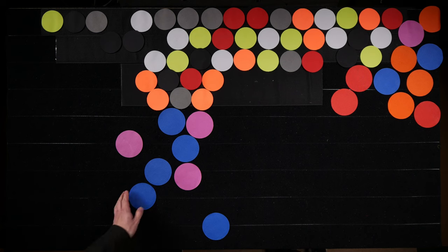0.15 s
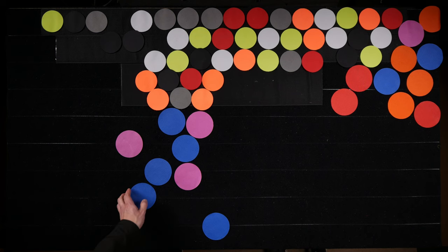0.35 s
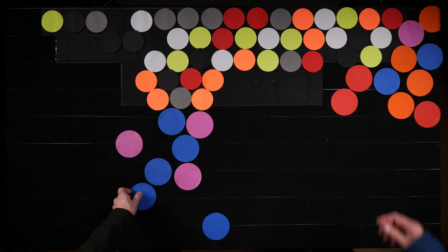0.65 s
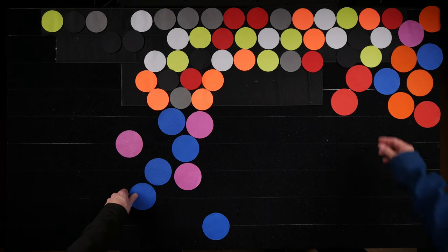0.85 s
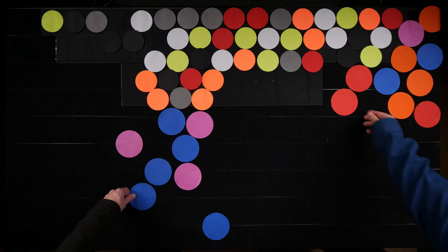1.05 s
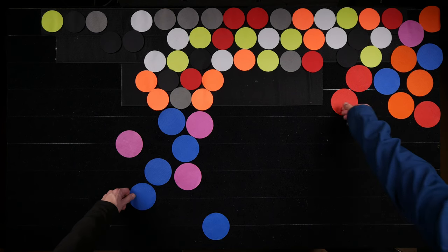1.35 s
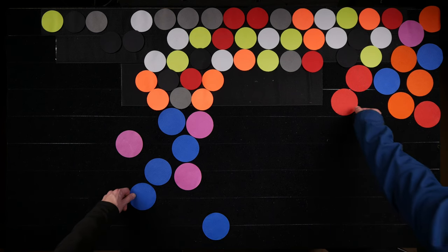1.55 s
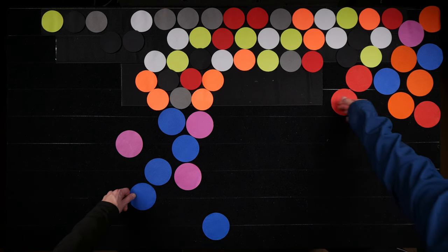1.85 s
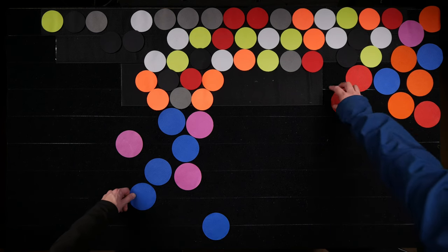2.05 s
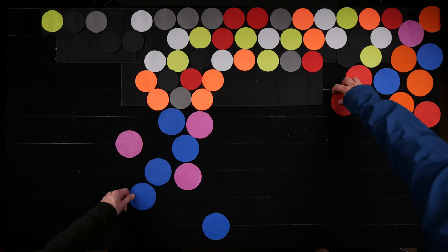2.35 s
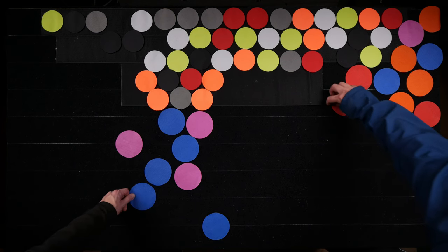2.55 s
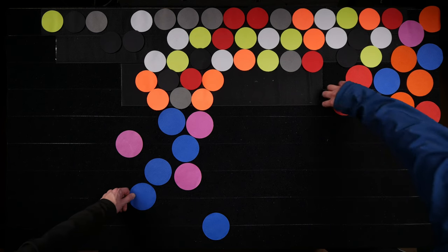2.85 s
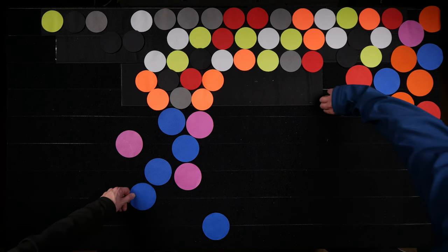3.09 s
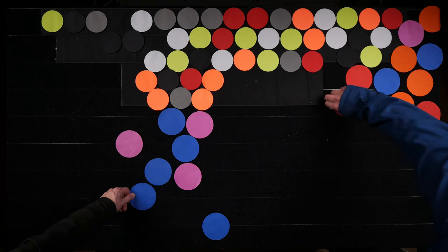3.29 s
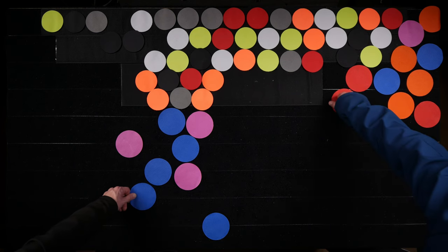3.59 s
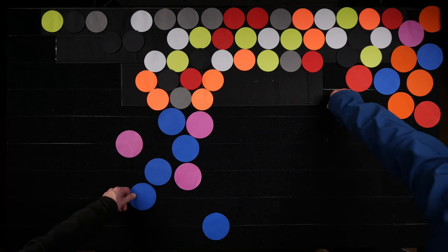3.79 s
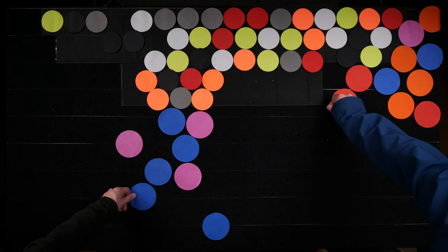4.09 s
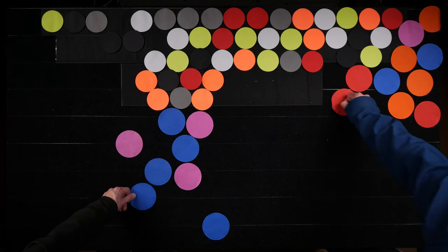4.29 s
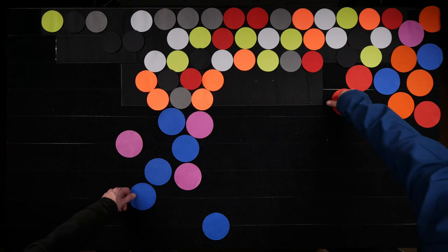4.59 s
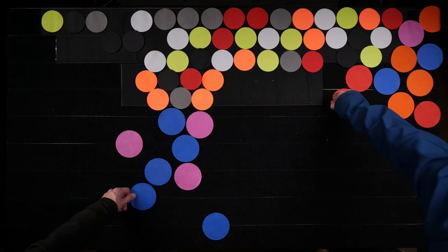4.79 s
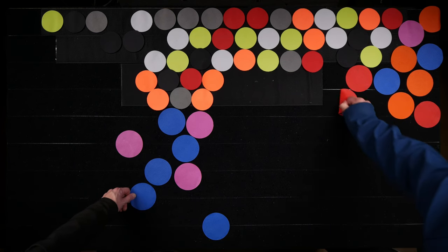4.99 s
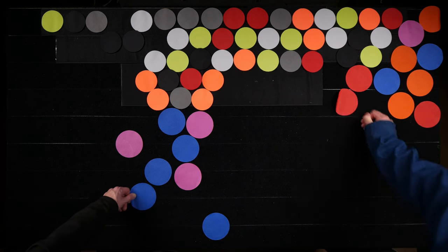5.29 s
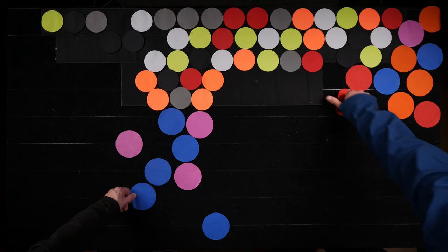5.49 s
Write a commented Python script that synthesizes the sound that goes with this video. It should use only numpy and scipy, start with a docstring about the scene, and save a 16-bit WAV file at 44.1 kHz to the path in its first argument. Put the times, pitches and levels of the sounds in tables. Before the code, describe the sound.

A quiet, close, dry stereo scene of fingers on felt hook-and-loop patches fixed to a large board, with soft steady hiss beneath. From 0 to 0.35 s a light cloth rub brushes past, with a small snap at 0.3. A brief crackly cluster of hook clicks and finger taps comes at 0.55-0.72, then faint rubs and ticks until 1.4. A short soft pull falls near 1.9. From 2 to 4 s it is mostly hush: lone tiny snaps, hollow fingertip scuffs, and a small click cluster around 3.4. At 4.2-4.28 a sharper bright crackle comes with a low knock. Little clicks thicken from 4.7, then the loudest event: a dense, crisp rip from 4.88 to about 5.17, strongest around 5.03, ending in a sharp snap and deep board thump at 5.15. Its low sway dies away under light clicks at 5.34-5.47 and a faint last tick at 5.62.

```python
"""Felt patches on a board

Felt patches with hook-and-loop backs are touched, peeled and pressed on a large board under two spaced microphones.
Hooks let go in dense clicks while a patch peels and in lone snaps: short noise bursts sent through resonances.
Sleeves and fingertips rustle as finer grains of noise, and dragging finger pads add hollow tones.
The board sways as a slow sine and knocks at its next few modes; a small damped room adds a short tail, over soft hiss."""
import sys
import numpy as np
from scipy import signal
from scipy.io import wavfile
from scipy.ndimage import uniform_filter1d, map_coordinates

SR = 44100
rng = np.random.default_rng(int(sys.argv[2]) if len(sys.argv) > 2 else 0)


def dump(signal):
    """Clip the signal to [-1, 1] and save it as 16-bit WAV at the path in sys.argv[1]."""
    limited = np.clip(np.atleast_2d(signal).T, -1, 1)
    pcm = np.round(limited * 32767).astype(np.int16)
    wavfile.write(sys.argv[1], SR, pcm)


N = 248724  # length of the scene in samples


def peel():
    """Rows of hooks tear loose while a patch is pulled: a dense tear with single hooks on top."""
    tear = crackle(rate=6900.0, spread_db=3.0, bunch_db=0.66, bunch_rate=300.0, burst_s=0.00016)
    lone_hooks = crackle(rate=260.0, spread_db=9.0, bunch_db=2.2, bunch_rate=160.0, burst_s=0.00021)
    tear_gains, lone_gains = pulls()
    return tear_gains * tear + lone_gains * lone_hooks


# Short pulls on a patch: (start [s], length [s], first level [dB], last level [dB],
# thud [dB re level], sizzle [dB re level], lone hooks [dB re the tear])
PEELS = [(0.65, 0.056, -51.5, -48.5, -3, 2, -7.5), (1.885, 0.08, -47, -52.5, -10, -5, -17),
         (3.395, 0.04, -56.5, -64, -7.5, -3, -15), (4.19, 0.074, -51, -41.5, -9, 2.5, -3),
         (4.375, 0.0069, -55.5, -49.5, -4, 2, -12), (5.44, 0.022, -49.5, -59, -1, 0, -7)]
PEEL_RISE_DB_S, PEEL_FALL_DB_S = 1500.0, 914
# The long tear: (time [s], level [dB], thud [dB re level], sizzle [dB re level])
TEAR = [(4.878, -52, 0, -5), (4.887, -46, -4, 4), (4.904, -40, -2.5, 2.5), (4.939, -30.5, -8.5, 3.5),
        (5.002, -29, -10.5, -7), (5.03, -24, -15, -12.5), (5.09, -29, -4.5, -4), (5.138, -31, -6.5, -6),
        (5.16, -39.5, -9, -12), (5.184, -54, -12, -18)]
TEAR_LONE_DB = -15  # lone hooks, relative to the long tear


def pulls():
    """Gains of the tear and of its lone hooks in the three ranges: short pulls plus the long tear."""
    level_db, thud_db, sizzle_db = curve(TEAR, outside=-120.0)
    long_tear = undb(level_db + np.array([thud_db, 0 * level_db, sizzle_db]))
    short_pulls = strokes(PEELS, PEEL_RISE_DB_S, PEEL_FALL_DB_S)
    return short_pulls + np.array([long_tear, long_tear * undb(TEAR_LONE_DB)])


# Lone hooks letting go: (time [s], level over the first 3 ms [dB], sizzle [dB re level])
SNAPS = [(0.3015, -46, 5), (0.485, -69, 10), (0.494, -69, 12), (0.509, -58, -10), (0.524, -52.5, -3),
         (0.5575, -51.5, 11.5), (0.643, -45.5, 9.5), (0.648, -56, 13), (0.6502, -40, 4), (0.6558, -47, 2),
         (0.67, -44, 1), (0.691, -39, 1), (0.7163, -43, -1), (0.834, -61, -9), (0.9232, -72, 19),
         (0.935, -67.5, 15), (1.0048, -66, 13), (1.032, -67, 12), (1.1083, -48.5, -17), (1.1329, -47.5, -2),
         (1.3305, -50, -4), (1.357, -47.5, 0), (1.3604, -51.5, 0.5), (1.824, -42, -3), (1.855, -53, -3),
         (1.867, -55, 1), (1.889, -55, -20), (2.2414, -54, -27), (2.3569, -58, 2), (2.369, -57, -9),
         (2.4164, -58.5, -12), (2.434, -51.5, -11), (2.693, -82.5, 18.5), (2.7412, -83.5, 18.5),
         (2.8759, -54.5, -3), (2.888, -50, -23), (2.9988, -48.5, 1.5), (3.0412, -59, -7), (3.3408, -66, 20),
         (3.3522, -55.5, 15), (3.39, -64.5, 15.5), (3.3988, -43.5, -7), (3.42, -42.5, -5.5),
         (3.4317, -49, -6), (3.5209, -65.5, 8), (3.55, -61, -20), (3.6469, -48, 6), (3.8097, -47.5, -12),
         (3.9285, -76, 21), (3.964, -56.5, -8), (4.0647, -54.5, -10), (4.115, -50, -2),
         (4.1183, -48.5, 5.5), (4.143, -62.5, 12.5), (4.164, -54, -4), (4.179, -55, -2), (4.1918, -47, 9),
         (4.206, -49, 5), (4.219, -48, 17.5), (4.224, -44, 18), (4.2309, -46, 16), (4.2345, -36.5, 11),
         (4.2361, -34, 4), (4.2517, -56, 4), (4.2632, -46, -4), (4.2706, -42, 4.5), (4.3673, -59, 7),
         (4.379, -46.5, 10), (4.3865, -60, 17), (4.5055, -57, 4.5), (4.5496, -59.5, 10.5), (4.6963, -57, 7),
         (4.7097, -49, 8), (4.7595, -47, 13.5), (4.7849, -47.5, 2), (4.8166, -37, -2), (4.849, -58, 11),
         (4.8625, -53, 5), (4.8838, -48.5, 15), (4.893, -39.5, 2.5), (4.9131, -34, 7), (4.921, -34, 0),
         (4.9345, -36, 7), (4.9418, -30, 5), (5.144, -37, -5), (5.1552, -38, 16), (5.159, -25.5, -28),
         (5.1727, -52, 10), (5.3104, -73, 20.5), (5.3415, -46, 7.5), (5.3478, -48.5, 8), (5.39, -54, -9),
         (5.3978, -41.5, 6.5), (5.442, -41, -2), (5.4493, -48, 4), (5.4653, -51, 14), (5.4679, -39, 3.5),
         (5.6212, -51.5, -23)]
SNAP_THUD_DB = -23  # relative to the level of each snap
# Fingertips tapping the felt: (time [s], level over the first 3 ms [dB])
TAPS = [(0.5561, -53), (0.6509, -44), (0.69, -46), (0.849, -58), (0.873, -57), (0.902, -56), (0.925, -58),
        (0.96, -61.5), (1.1179, -66.5), (1.357, -60), (1.8895, -43), (2.703, -61.5), (2.9977, -49),
        (3.3996, -52.5), (3.6485, -53), (4.115, -54), (4.166, -56), (4.1915, -55), (4.2388, -41.5),
        (4.2706, -34.5), (4.3763, -45), (4.7095, -58), (4.784, -48), (4.8152, -47), (4.8846, -54),
        (4.9041, -35), (5.1547, -28), (5.342, -47), (5.3483, -45.5), (5.3953, -47.5), (5.4494, -44),
        (5.469, -38.5)]
CRACK_T60_S = 0.0013  # time for the crack to fall by 60 dB
FIZZ_DB, FIZZ_T60_S = -13, 0.013  # fizz of a hook, relative to its crack
TAP_FIZZ_DB, TAP_T60_S = -11, 0.02  # the same for a fingertip


def snaps():
    """Each snap or tap is a sharp crack with a dying fizz; hooks are bright, fingertips dull."""
    t = np.arange(4096) / SR
    out = np.zeros((3, N + len(t)))
    hits = []
    for s, db, sizzle_db in SNAPS:
        gains = undb(db + np.array([SNAP_THUD_DB, 0, sizzle_db]))
        hits.append((s, gains, FIZZ_DB, FIZZ_T60_S))
    for s, db in TAPS:
        thud_only = undb(db) * np.array([1, 0, 0])
        hits.append((s, thud_only, TAP_FIZZ_DB, TAP_T60_S))
    crack = np.exp(-np.log(1000) * t / CRACK_T60_S)
    for s, gains, fizz_db, t60 in hits:
        grain = rng.standard_normal(len(t))
        fizz = undb(fizz_db) * np.exp(-np.log(1000) * t / t60)
        burst = np.sign(grain) * crack + grain * fizz
        burst = burst / np.sqrt(np.mean(burst[t < 0.003] ** 2))
        start = int(s * SR)
        out[:, start:start + len(t)] += np.outer(gains, burst)
    return out[:, :N]


# Strokes of cloth and fingertips: (start [s], length [s], first level [dB], last level [dB],
# thud [dB re level], sizzle [dB re level])
RUBS = [(0.0, 0.093, -54, -56, -7, -3), (0.12, 0.21, -56.5, -58, -33, 1),
        (0.31, 0.081, -65, -60, -2.5, -4.5), (0.5, 0.075, -82, -71.5, -3, 7),
        (0.73, 0.046, -58, -72, -8.5, -0.5), (0.83, 0.11, -62.5, -65, -2.5, -0.5),
        (1.0, 0.12, -74.5, -57, -12.5, -2.5), (1.31, 0.0067, -74.5, -69, -8, -3),
        (1.4, 0.073, -66.5, -62.5, -5, -2), (1.5, 0.1, -67.5, -59, -2.5, -1),
        (1.74, 0.18, -78, -59.5, 5, -11.5), (2.08, 0.071, -82, -75, -7.5, 2.5),
        (2.28, 0.051, -76, -72.5, -4, -7.5), (2.5, 0.031, -77, -76.5, -7, 0),
        (2.6, 0.037, -87.5, -74, -8.5, -26), (2.96, 0.049, -77.5, -64.5, -4, 1.5),
        (3.05, 0.24, -82.5, -93, -7, 9.5), (3.34, 0.023, -82, -80, 4, 8), (3.5, 0.075, -79, -81, -20, 4),
        (3.645, 0.042, -74, -74, -9, 3.5), (3.75, 0.063, -78, -66.5, -13, 5.5),
        (3.83, 0.057, -80, -73.5, -28, 1.5), (4.112, 0.056, -77, -63, -22, -2.5),
        (4.29, 0.03, -63, -58.5, -5, -3), (4.4, 0.054, -74, -76, -7, 3),
        (4.55, 0.067, -68.5, -77.5, -2, 3.5), (4.68, 0.06, -71, -62.5, -7, 5.5),
        (4.79, 0.084, -72.5, -53, -0.5, 0), (5.19, 0.076, -61, -65, -7.5, -6.5),
        (5.343, 0.025, -58.5, -73, -7, -33), (5.395, 0.033, -64, -65, -23, -25),
        (5.48, 0.12, -68, -67, -7, -3)]
RUB_RISE_DB_S, RUB_FALL_DB_S = 542, 432


def rub_gains():
    """Gains of the rubbing strokes in the three ranges."""
    return strokes(RUBS, RUB_RISE_DB_S, RUB_FALL_DB_S)[0]


# Faint rustle between the strokes: (time [s], level [dB])
RUSTLE = [(0, -66.5), (1.15, -70.5), (1.28, -77), (1.68, -73), (2.0, -75), (2.62, -77.5), (2.68, -109),
          (2.82, -76), (2.9, -72), (3.45, -72), (3.62, -80), (4.0, -75.5), (4.1, -87), (4.45, -86),
          (4.52, -97), (4.65, -83), (5.33, -97), (5.64, -75)]
RUSTLE_THUD_DB, RUSTLE_SIZZLE_DB = -15.5, -11  # relative to the rustle level
RUB_LONE_DB = -7  # catching fibres, mostly sizzle with a little body, relative to the grain


def rub():
    """Cloth slides on cloth: a dense fine grain, now and then a fibre that catches."""
    rustle = undb(curve(RUSTLE) + np.array([[RUSTLE_THUD_DB], [0], [RUSTLE_SIZZLE_DB]]))
    grain = crackle(rate=12000.0, spread_db=1.5, bunch_db=3.02, bunch_rate=200.0, burst_s=0.00016)
    catches = crackle(rate=90.0, spread_db=3.0, bunch_db=2.2, bunch_rate=6.7, burst_s=0.0003)
    catches = catches * np.array([[0], [0.3], [1]])  # thud, body, sizzle
    return (rub_gains() + rustle) * (grain + undb(RUB_LONE_DB) * catches)


# Finger pads dragging over the felt: (start [s], length [s], level [dB], tone [Hz])
SCUFFS = [(0.29, 0.07, -74.5, 330), (0.46, 0.033, -63.5, 950), (0.839, 0.084, -67, 760),
          (0.956, 0.09, -65.5, 900), (1.07, 0.047, -74, 332), (1.41, 0.043, -64.5, 506),
          (1.508, 0.093, -66.5, 586), (1.734, 0.07, -66, 563), (1.878, 0.019, -54, 450),
          (2.03, 0.039, -78, 700), (2.297, 0.022, -70, 597), (2.617, 0.038, -77.5, 530),
          (2.905, 0.04, -79, 680), (3.154, 0.033, -72, 1090), (3.55, 0.015, -70, 1350),
          (3.785, 0.041, -78, 514), (4.218, 0.042, -54, 430)]
SCUFF_Q = 3  # sharpness of each of the two resonances


def scuff():
    """A dragging pad sticks and slips; the hollow under it rings."""
    grain = crackle(rate=900.0, spread_db=1.8, bunch_db=2.2, bunch_rate=66.0, burst_s=0.002)
    out = np.zeros(N)
    for s, length, db, hz in SCUFFS:
        gain = strokes([(s, length, db, db, 0, 0)], RUB_RISE_DB_S, RUB_FALL_DB_S)[0, 1]
        near = slice(int((s - 0.1) * SR), int((s + length + 0.25) * SR))
        width = hz / SCUFF_Q
        tone = band(band((gain * grain)[near], hz, width), hz, width)
        # make up for what the narrow resonances take away
        out[near] += tone * np.sqrt(SR * SCUFF_Q / (hz * np.pi / 2))
    return out


# A hand pushes or steadies the board and leaves it swaying at a new size: (time [s], level [dB])
SWAYS = [(0, -54.5), (0.25, -60.5), (0.5, -61.5), (0.7, -50.5), (1.21, -47.5), (1.33, -48.5), (1.62, -56),
         (1.98, -63), (2.165, -47.5), (2.58, -59.5), (2.66, -73.5), (3.0, -58), (3.3, -56), (3.45, -80),
         (3.511, -51.5), (3.828, -52.5), (4.04, -68), (4.16, -55.5), (4.26, -43.5), (4.5, -51.5),
         (4.79, -58), (4.86, -48), (5.05, -49), (5.17, -34.5)]
SWAY_HZ = 29.5  # centre of a slightly wandering pitch
SWAY_T60_S, SWAY_SETTLE_S = 2.02, 0.026


def sway():
    """The panel swings at its lowest mode and dies away slowly after each change of size."""
    t = np.arange(N) / SR
    since, size_db = np.transpose(SWAYS)
    last = np.maximum(np.searchsorted(since, t, side="right") - 1, 0)
    size = undb(size_db[last] - 60 * (t - since[last]) / SWAY_T60_S)
    size = uniform_filter1d(size, int(SWAY_SETTLE_S * SR))
    turn = 2 * np.pi * np.cumsum(SWAY_HZ * (1 + 0.0359 * walk(4.1))) / SR
    # the two microphones hang over different parts of the panel
    swing = np.sqrt(2) * np.sin(turn + 0.18 * np.array([[1], [-1]]))
    return size * undb(1.0 * walk(12.0)) * swing


# Fingers landing on the board; both levels drive the filters below:
# (time [s], peak of the push [dB], rumble that follows [dB])
THUMPS = [(0.343, -45, -83), (0.644, -51, -65), (1.3, -53.5, -79), (1.345, -46, -68), (1.419, -52, -61),
          (1.791, -54, -58.5), (1.868, -66, -75), (2.16, -74, -70), (2.302, -48, -70), (2.701, -62, -75),
          (2.997, -51, -72), (3.355, -51.5, -62), (3.41, -76, -64), (3.515, -68, -65),
          (4.231, -30.5, -44.5), (4.262, -32.5, -44), (4.549, -66, -72), (4.702, -59.5, -57),
          (4.89, -40, -49.5), (4.918, -33, -54), (5.153, -17.5, -35.5), (5.163, -33, -41),
          (5.456, -58, -76)]
PUSH_S = 0.0045  # length of one push
# The board's next few modes: (frequency [Hz], width [Hz], relative gain [dB])
KNOCK_MODES = [(44, 17.4, 4), (75.4, 5.8, 0.5), (93, 5.7, -5.5), (145.5, 15.2, -2), (209, 80, -16)]
# steady shake, then shake relative to the tear and to the rubbing
KNOCK_FLOOR_DB, KNOCK_TEAR_DB, KNOCK_RUB_DB = -82, -9.5, -27
KNOCK_T60_S = 0.17  # time for a rumble to fall by 60 dB


def knocks():
    """Tearing, rubbing and landing fingers shake the board's next few modes; each push also thumps."""
    s, peak_db, rumble_db = np.transpose(THUMPS)
    pushes, rumbles = np.zeros((2, N))
    pushes[(s * SR).astype(int)] = undb(peak_db)
    rumbles[(s * SR).astype(int)] = undb(rumble_db)
    pushes = signal.fftconvolve(pushes, np.hanning(int(PUSH_S * SR)))[:N]
    shake = undb(KNOCK_FLOOR_DB) + undb(KNOCK_TEAR_DB) * pulls()[0, 0]
    shake = shake + undb(KNOCK_RUB_DB) * rub_gains()[1]
    shake = shake + signal.lfilter([1], [1, -1000 ** (-1 / (KNOCK_T60_S * SR))], rumbles)
    mid = shake * rng.standard_normal(N)
    side = shake * rng.standard_normal(N)
    opposite = np.array([[1], [-1]])  # left and right move against each other
    drive = mid + undb(-13.0) * side * opposite + undb(-25.5) * pushes
    knock = ring(drive, KNOCK_MODES, patchy_db=-1.0)
    knock = knock + undb(-6.0) * ring(side, KNOCK_MODES[1:2], patchy_db=-0.5) * opposite
    return knock + undb(-18.5) * band(pushes, 110, 370)


# Who sounds from when, sleeve in the middle and a patch on each side:
# (time [s], left lags right [ms], left minus right [dB])
PLACES = [(0, .18, -.5), (.47, -.25, 0), (.87, .16, -.5), (1.19, .45, -3), (4.08, .41, -2),
          (4.33, -.23, -1), (4.42, .43, -1), (5.27, -.23, 0), (5.52, .43, 0)]
# the sounding spot jumps about the patch, further over a sleeve
HOOK_SPREAD_MS, CLOTH_SPREAD_MS, JUMPS_PER_S = 0.019, 0.072, 500


def place(x, spread_ms):
    """A source off to one side reaches the two microphones at different times, often at different levels."""
    s, lag_ms, pan_db = np.transpose(PLACES)
    n = np.arange(N)
    now = np.searchsorted(s * SR, n, side="right") - 1
    late = n - (lag_ms[now] + spread_ms * walk(JUMPS_PER_S)) * SR / 1000
    left = map_coordinates(x, [late], order=3, mode="nearest")
    return np.array([left * undb(pan_db[now] / 2), x * undb(-pan_db[now] / 2)])


# Resonances that hooks, taps and rubbed cloth all sound through, by range:
# (frequency [Hz], width [Hz], relative gain [dB])
THUD = [(336, 89, -10), (493, 99, 3.5), (744, 820, 1), (1211, 306, 3.5)]
BODY = [(1310, 1480, 1), (2525, 424, 7), (3034, 368, 0.5), (3593, 280, 7.5), (5180, 6100, -2),
        (6440, 700, -0.5)]
SIZZLE = [(7800, 9300, -62), (7960, 13500, 75), (11000, 7300, -3), (16600, 2900, 21)]
# Edges of the thud, body and sizzle ranges: (low [Hz], high [Hz])
EDGES_HZ = [(260, 1300), (1300, 6800), (5600, 18000)]


def colour(drive, patchy_db):
    """The three ranges, each through its resonances and kept to its edges."""
    out = np.zeros(N)
    for x, modes, edges in zip(drive, (THUD, BODY, SIZZLE), EDGES_HZ):
        edge_filter = signal.butter(2, edges, "band", fs=SR, output="sos")
        out += signal.sosfilt(edge_filter, ring(x, modes, patchy_db))
    return out


ROOM_T60_S, ROOM_DB, ROOM_HZ = 0.06, -12.5, 9100  # decay time, tail level, treble cut


def room(x):
    """A short diffuse tail, duller than the direct sound and different at each microphone."""
    t = np.arange(SR // 3) / SR
    decay = np.exp(-np.log(1000) * t / ROOM_T60_S)
    tail = rng.standard_normal((2, len(t))) * decay * np.minimum(t / 0.008, 1)
    tail = signal.lfilter(*signal.butter(1, ROOM_HZ, fs=SR), tail)
    tail = tail * undb(ROOM_DB) / np.sqrt(np.sum(tail ** 2) / 2)
    return signal.fftconvolve(x[None], tail, axes=1)[:, :N]


def hiss():
    """Soft steady noise, separate at each microphone, strongest around 4300 Hz."""
    return undb(-75.5) * band(rng.standard_normal((2, N)), 4300, 7160)


def strokes(rows, rise_db_s, fall_db_s):
    """Gains in three ranges: strokes rise, slide from first to last level, fall; a last column scales a second set."""
    t, out = np.arange(N) / SR, np.zeros((2, 3, N))
    for s, length, first_db, last_db, thud_db, sizzle_db, *extra_db in rows:
        near = slice(max(int((s - 0.1) * SR), 0), int((s + length + 0.2) * SR))
        u = t[near] - s
        db = np.interp(u, [0, length], [first_db, last_db])
        db = db + rise_db_s * np.minimum(u, 0) - fall_db_s * np.maximum(u - length, 0)
        gains = undb(db + np.array([[thud_db], [0], [sizzle_db]]))
        out[0, :, near] += gains
        out[1, :, near] += gains * undb(sum(extra_db))
    return out


def crackle(rate, spread_db, bunch_db, bunch_rate, burst_s):
    """Random releases, a few much larger than most, coming in bunches; each is a short burst."""
    hits = (rng.random(N) < rate / SR) * undb(2 * spread_db * rng.exponential(size=N))
    power = signal.lfilter([1], [1, -np.exp(-1 / (burst_s * SR))], hits)
    return unit(np.sqrt(power) * rng.standard_normal(N) * undb(bunch_db * walk(bunch_rate)))


def ring(drive, modes, patchy_db):
    """Resonances side by side, each flickering in level; scaled to roughly keep the level of white noise."""
    impulse = (np.arange(16384) == 0) * 1.0
    response, out = 0, 0
    for k, (hz, width, db) in enumerate(modes):
        sign = (-1) ** k  # neighbours swing in opposite sense, so the gaps between them fill
        response = response + sign * undb(db) * band(impulse, hz, width)
        out = out + sign * undb(db + patchy_db * walk(200)) * band(drive, hz, width)
    return out / np.sqrt(np.sum(response ** 2))


def band(x, hz, width):
    """One resonance, gain 1 at the centre."""
    return signal.lfilter(*signal.iirpeak(hz, hz / width, fs=SR), x)


def walk(rate):
    """Random levels held 1 / rate s and slewed; spread near 1."""
    k = int(SR / rate)
    steps = np.repeat(rng.standard_normal(N // k + 1), k)
    return 1.066 * uniform_filter1d(steps, k)[:N]


def curve(rows, outside=None):
    """Columns of (time, value, ..) rows at every sample, joined by straight lines."""
    s, *columns = np.transpose(rows)
    return np.array([np.interp(np.arange(N) / SR, s, c, outside, outside) for c in columns])


def undb(db):
    """Decibels to a plain gain."""
    return 10 ** (np.asarray(db) / 20)


def unit(x):
    """Scale to an rms of 1."""
    return x / np.sqrt(np.mean(x ** 2))


def scene():
    """Hooks and cloth placed between the microphones, with room, board and hiss."""
    hooks = colour(peel(), patchy_db=1.5) + colour(snaps(), patchy_db=0.5)
    cloth = colour(rub(), patchy_db=-0.7) + scuff()
    direct = place(hooks, HOOK_SPREAD_MS) + place(cloth, CLOTH_SPREAD_MS)
    board = sway() + knocks()
    return direct + room(hooks + cloth) + board + hiss()


def record(dry):
    """The recorder cuts the top: a steep low-pass at 15900 Hz."""
    return signal.sosfilt(signal.ellip(10, 0.2, 70, 15900, fs=SR, output="sos"), dry)


dry = scene()
out = record(dry)
dump(out)
```